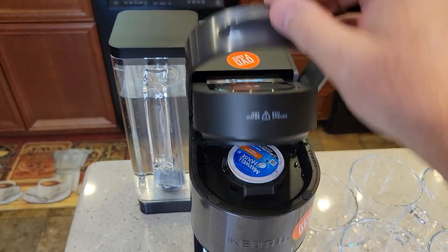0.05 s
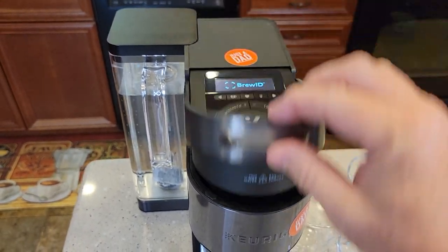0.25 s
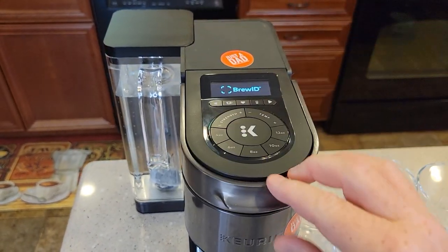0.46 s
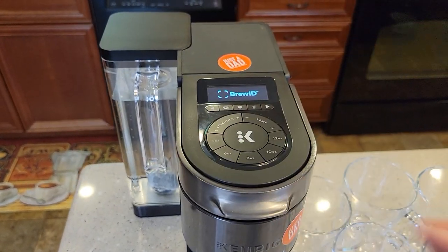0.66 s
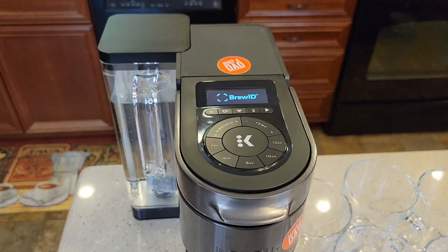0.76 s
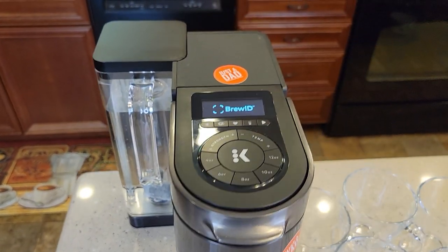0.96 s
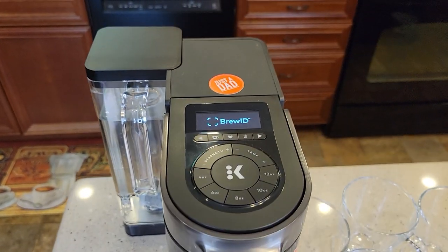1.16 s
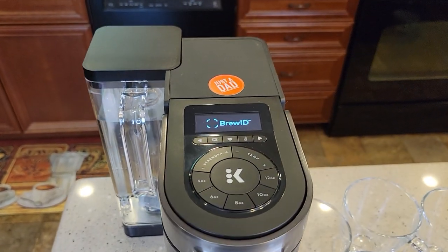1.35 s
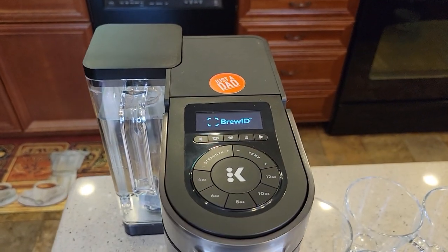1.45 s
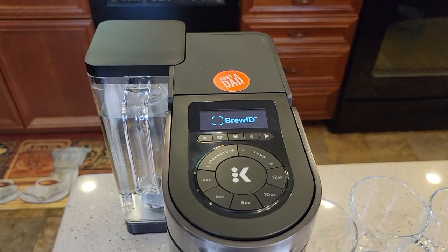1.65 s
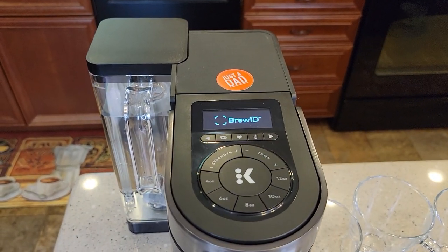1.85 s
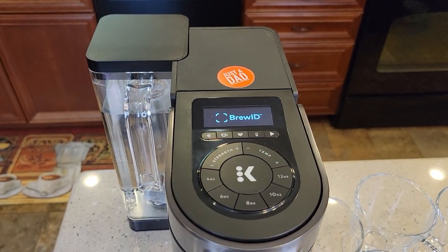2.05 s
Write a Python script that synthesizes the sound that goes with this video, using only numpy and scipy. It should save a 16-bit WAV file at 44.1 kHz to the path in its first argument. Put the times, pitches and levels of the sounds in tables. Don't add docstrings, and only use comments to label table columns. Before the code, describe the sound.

Closing a pod coffee maker's lid in a kitchen: light ticks and sliding rustle, a crisp latch snap, rapid bright clicks, a low hollow thunk, short room tail, then faint hum; close microphone.

```python
import sys
import numpy as np
from scipy import signal
from scipy.io import wavfile

SR = 44100
rng = np.random.default_rng(int(sys.argv[2]) if len(sys.argv) > 2 else 0)


def to_linear_factor(level_db):
    exponent = np.asarray(level_db, float) / 20
    return 10 ** exponent


def materialize(psi):
    bounded = np.clip(np.atleast_2d(psi).T, -1, 1)
    quanta = np.round(bounded * 32767).astype(np.int16)
    wavfile.write(sys.argv[1], SR, quanta)


N = 92874


def rms_one(x):
    return x / np.sqrt(np.mean(x ** 2) + 1e-20)


def in_time(rows):
    return np.interp(np.arange(N) / SR, *np.transpose(rows))


def at_hz(rows, hz, axis=1):
    rows = np.array(rows)
    return np.interp(np.log(hz), np.log(rows[:, 0]), rows[:, axis])


def drift(rate_hz):
    settle = 2000
    r = np.exp(-80 * np.pi * rate_hz / SR)
    white = rng.standard_normal(N // 40 + settle + 2)
    slow = signal.lfilter([1], [1, -2 * r, r * r], white)[settle:]
    return np.interp(np.arange(N) / 40, np.arange(len(slow)), rms_one(slow))


def bands(low_hz, count):
    edges = low_hz * 2 ** (np.arange(count + 1) / 3)
    white = rng.standard_normal((2, N))
    out = []
    for k, (low, high) in enumerate(zip(edges, edges[1:])):
        band = signal.butter(4, [low, high], "band", fs=SR, output="sos")
        out.append((np.sqrt(low * high), signal.sosfilt(band, white[k % 2])))
    return out


def air(spectrum, low_hz, count, patchy_db):
    together = drift(3.0)
    total = 0
    for hz, noise in bands(low_hz, count):
        flicker_db = patchy_db * (0.2 * together + drift(37))
        total = total + noise * to_linear_factor(at_hz(spectrum, hz) + flicker_db)
    return rms_one(total)


def appliance_hum():
    # frequency in Hz, level in dB per Hz.
    hum_spectrum = [(45, -38), (150, -7.5), (260, 1.5), (340, -7), (480, 2), (1000, -15.5), (1300, -15.5),
                    (1600, -35.5)]
    # time in seconds, level in dB.
    swell = [(0, 11), (.85, -2.5), (1.2, 0.5), (1.5, -5), (1.9, -0.5), (2.1, -1)]
    return to_linear_factor(-54.5 + in_time(swell)) * air(hum_spectrum, low_hz=39.94, count=17, patchy_db=2.5)


def hiss():
    # frequency in Hz, level in dB per Hz.
    hiss_spectrum = [(2700, -16), (3200, -5), (4200, 0), (5800, -2), (7000, -13), (8500, -19), (12000, -23),
                     (16000, -25)]
    return to_linear_factor(-75) * air(hiss_spectrum, low_hz=1850, count=9, patchy_db=.7)


def kitchen(x):
    # frequency in Hz, t60 in seconds, level in dB.
    room_decay = [(100, 0.2, -13), (300, 0.3, -14), (600, .36, -13), (1100, .42, -12), (2090, 0.4, -4),
                  (3800, .52, -7), (8000, .33, -1.5), (14200, .15, -9)]
    onset_s = 0.00087
    t = np.arange(N) / SR
    tail = 0
    for hz, noise in bands(low_hz=51.92, count=25):
        t60 = at_hz(room_decay, hz)
        fade = to_linear_factor(at_hz(room_decay, hz, axis=2) - 60 * t / t60)
        tail = tail + noise * fade / np.sqrt(t60 * SR / np.log(1e6))
    build_up = 1 - np.exp(-(t / onset_s) ** 2)
    return signal.fftconvolve(x, tail * build_up)[:N]


def slide():
    # time in seconds, level in dB.
    travel = [(0, -40.5), (.03, -50.5), (.06, -47), (.14, -51.5), (.2, -39), (.3, -39), (.37, -55.5),
              (.45, -69.5), (.6, -120)]
    catches_per_s = 5700
    sizes = to_linear_factor(1.3 * np.minimum(rng.exponential(1, N), 4)) * rng.choice([-1, 1], N)
    caught = rng.random(N) < catches_per_s / SR
    return to_linear_factor(in_time(travel) - 33) * rms_one(sizes * caught)


def ring(clicks, hz, t60):
    r, w = to_linear_factor(-60 / (t60 * SR)), 2 * np.pi * hz / SR
    return signal.lfilter(np.cos(w / 2) * np.array([1, -1]), [1, -2 * r * np.cos(w), r * r], clicks + 1e-18)


def contacts(count, touch_s, rough):
    t = np.arange(600) / SR
    push = (1 - rough) * t + rough * rng.standard_normal((count, 600))
    push = push * np.exp(-t / touch_s)
    energy = np.sum(push ** 2, axis=1, keepdims=True)
    return push / (rough * np.sqrt(energy) + (1 - rough) * np.sum(push, axis=1, keepdims=True))


def body(modes, hits, level_db, touch_s, octaves, rough, rub):
    blur = .3
    ring_cycles = 150
    s, hit_db, centre = np.transpose(hits)
    push = contacts(len(s), touch_s, rough)
    where = (s[:, None] * SR).astype(int) + np.arange(600)
    spread_db = 1.5 * rng.standard_normal((len(s), len(modes)))
    out = np.zeros((2, N))
    for k, (hz, db, t60) in enumerate(modes):
        off_db = -6 * np.minimum((np.log2(hz / centre) / octaves) ** 2, 3)
        strength = to_linear_factor(hit_db + level_db + off_db + spread_db[:, k])
        force = np.zeros(N)
        np.add.at(force, where, push * strength[:, None])
        t60 = np.clip(t60, .001, ring_cycles / hz)
        short_t60 = max(blur * t60, 6 / hz)
        rubbed, blurred = ring(np.array([rub, force]), hz, short_t60) / np.sqrt(blur)
        sign = (1 - 2 * rough) ** k
        out += sign * to_linear_factor(db) * (rubbed + np.array([ring(force, hz, t60), blurred]))
    return out


def base():
    # frequency in Hz, level in dB, t60 in seconds.
    base_modes = [(80, -17, .33), (102, -18, .28), (249, -4.5, .7), (364, -12, .22)]
    # start in seconds, level in dB, centre of the modes struck in Hz.
    blows = [
        (.149, -25.5, 332.6),
        (0.288, -34.5, 300),
        (.376, -19, 230.6),
    ]
    return body(base_modes, blows, 2.7, touch_s=0.00032, octaves=3.4, rough=0, rub=np.zeros(N))


def housing(rub):
    # frequency in Hz, level in dB, t60 in seconds.
    housing_modes = [(173.1, -35.5, .15), (217.8, -13, 0.047), (270, -7.5, .03), (285, -6.5, 0.054),
                     (320, -5.5, 0.02), (355.5, -15.5, 0.41), (385, -10, 0.042), (427.1, -16, 0.053),
                     (560, -15, 0.027)]
    # start in seconds, level in dB, centre of the modes struck in Hz.
    knocks = [(0.04, -30.5, 330), (0.048, -32.5, 280), (0.0909, -38, 360), (0.101, -38, 330),
              (0.118, -40, 330), (0.1476, -13, 400), (0.157, -12, 350), (0.165, -15.5, 350),
              (.172, -21, 400), (0.184, -12, 350), (0.252, -32, 400), (0.2747, -18.5, 400),
              (0.288, -10, 340), (0.2907, -14.5, 340), (.299, -20, 300), (0.307, -17.5, 300),
              (.3700, -7, 320), (0.3726, 0.5, 330), (0.376, 2, 320), (0.385, -6, 260), (0.391, -13.5, 300),
              (0.406, -24, 330), (.4165, -12.5, 340), (0.4195, -14.5, 340), (0.439, -29.5, 300),
              (.447, -18.5, 300)]
    return body(housing_modes, knocks, -3.5, touch_s=0.00022, octaves=0.44, rough=0, rub=rub * to_linear_factor(1.5))


def lid(rub):
    # frequency in Hz, level in dB, t60 in seconds.
    lid_modes = [(596, -6, .09), (635, -5, 0.06), (800, -10, 0.079), (868, -10, 0.059), (950, -5.5, 0.04),
                 (1071, -3, 0.032), (1150, -6, .075), (1343, -7, 0.03), (1485, -12, 0.013),
                 (1560, -10, 0.022), (1680, -6, .045)]
    # start in seconds, level in dB, centre of the modes struck in Hz.
    taps = [(0.0349, -26.5, 962.5), (0.0379, -25, 943), (.040, -31, 950), (0.0428, -29.5, 957),
            (.045, -33.5, 950), (.052, -34, 833), (.058, -41, 695.6), (0.096, -33, 998),
            (0.099, -30.5, 991), (0.1483, -19.5, 903), (0.1497, -4, 1100), (0.155, -11.5, 905.6),
            (.160, -14.5, 697), (.171, -23, 700), (.178, -20, 876.4), (0.1811, -8, 1038),
            (.187, -26, 896.4), (0.2201, -16, 2000), (.229, -20.5, 2000), (0.242, -17, 1597),
            (0.2534, -12.5, 1700), (0.2522, -5, 1100), (.2545, -3, 1073), (0.2737, -19, 1100),
            (0.2754, -10, 1148), (0.278, -18, 1134), (0.288, -15.5, 1000), (0.291, -17, 697.3),
            (0.3709, -13.5, 750), (0.3721, -8, 758.6), (0.3731, -20, 1800), (.376, -25, 780),
            (.386, -19, 710), (0.396, -36, 760), (0.393, -37, 885), (0.444, -33, 857)]
    shell = body(lid_modes, taps, -1, touch_s=.00008, octaves=0.47, rough=0, rub=rub)
    return signal.sosfilt(signal.butter(4, 1500, fs=SR, output="sos"), shell)


def hinge(rub):
    # frequency in Hz, level in dB, t60 in seconds.
    hinge_modes = [(2900, -16, .008), (3490, -1.5, .014), (4160, -5.5, 0.019), (4420, -5.5, .014),
                   (5960, -6.5, .01), (5200, -6, .003), (7000, -6, .003), (8100, -5.5, 0.0054),
                   (9000, -6, .003), (10600, -5.5, .002)]
    # start in seconds, level in dB, centre of the modes struck in Hz.
    ticks = [(.0353, -43, 3600), (.0406, -31, 5500), (.0425, -34, 4600), (.045, -38, 4600),
             (.053, -41, 4200), (.058, -47, 4200), (.0774, -39, 3700), (.0795, -40, 4000),
             (.0815, -35, 3700), (.086, -42, 4200), (.0922, -37, 4600), (.0938, -36, 4200),
             (.0965, -38, 4200), (.0982, -29, 3900), (.0998, -34, 3900), (.111, -46, 3600),
             (.134, -47, 3600)]
    return body(hinge_modes, ticks, 2.5, touch_s=.0014, octaves=.6, rough=1, rub=rub * to_linear_factor(-2.5))


def catches(rub):
    # frequency in Hz, level in dB, t60 in seconds.
    catch_modes = [(2150, -16, .006), (2574, -2, 0.01), (3020, -6.5, 0.017), (3637, -5.5, 0.017),
                   (3970, -8.5, 0.026), (4500, -4, .01), (4970, -10.5, 0.0053), (5400, -7, .007),
                   (6430, -6.5, .007), (7730, -5.5, 0.0046), (9300, -4.5, 0.0025), (10400, -0.5, 0.0039),
                   (11800, -6.5, .002), (14000, -12, .001)]
    # start in seconds, level in dB, centre of the modes struck in Hz.
    clicks = [(0.24, -14, 3890), (.243, -20, 2992), (0.2506, -22, 4232), (0.2524, -6, 4500),
              (.2545, -9.5, 2800), (.257, -18.5, 3500), (0.272, -17, 5500), (0.2736, -12, 4500),
              (0.2745, -9.5, 5000), (.2775, -16.5, 5500), (0.2798, -18, 5000), (.2838, -18.5, 3600),
              (0.2859, -12.5, 4600), (0.2867, -11, 7000), (0.2882, -9, 2409), (0.292, -16, 2600),
              (0.293, -19.5, 2400), (.3025, -22, 5024), (.3705, -29, 6500), (.372, -23, 7000),
              (.3735, -25, 2900) ]
    return body(catch_modes, clicks, 3, touch_s=.0009, octaves=0.75, rough=1, rub=rub * to_linear_factor(-8))


def latch(rub):
    # frequency in Hz, level in dB, t60 in seconds.
    latch_modes = [(2550, -13.5, .012), (2803, -9, .03), (2886, -11.5, .035), (3447, -8, .02),
                   (3836, -4.5, .018), (4310, -6, .014), (5050, -5.5, .005), (5710, -9.5, .03),
                   (6090, -9, 0.0077), (6430, -9.5, .005), (7300, -8, 0.0056), (8770, -4, .004),
                   (10100, -2.5, .002), (13200, -12.5, .001)]
    # start in seconds, level in dB, centre of the modes struck in Hz.
    snaps = [(.1470, -2, 4600), (.1477, -6, 4200), (.149, -8.5, 3000), (.1525, -14, 3600),
             (.158, -12, 4523), (.1615, -13, 4500), (.164, -13, 4200), (.168, -17, 5500), (.171, -16, 4000),
             (.176, -20, 4000), (.181, -16, 5000), (.188, -21, 4500), (.194, -21, 4000), (.204, -23, 5500),
             (.211, -22, 4000), (.221, -25, 3000), (.231, -24, 4000), (.236, -25, 3800)]
    return body(latch_modes, snaps, 1, touch_s=0.0013, octaves=1, rough=1, rub=rub * to_linear_factor(-6.5))


def coffee_maker():
    rub = slide()
    hollow = base() + housing(rub) + lid(rub)
    return hinge(rub) + catches(rub) + latch(rub) - hollow


def scene():
    background = appliance_hum() + hiss()
    near, around = coffee_maker()
    return (near + kitchen(around) + background)[None]


def band_limit(x):
    return signal.sosfilt(signal.butter(12, 16260, fs=SR, output="sos"), x)


def record(dry):
    top = .98
    x = top * np.tanh(dry / top)
    x = signal.sosfilt(signal.butter(6, 69, "high", fs=SR, output="sos"), x)
    x = signal.sosfilt(signal.cheby2(10, 50, 16300, fs=SR, output="sos"), x)
    return band_limit(x)


dry = scene()
out = record(dry)
materialize(out)
```